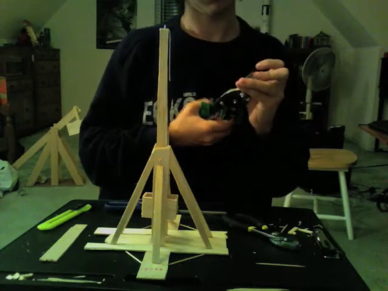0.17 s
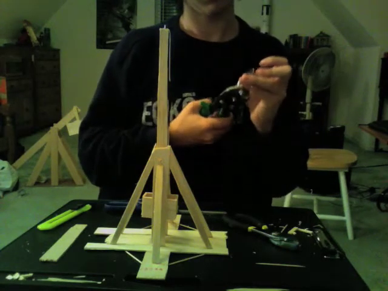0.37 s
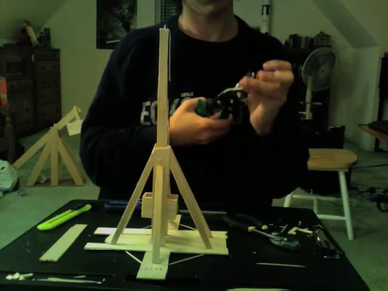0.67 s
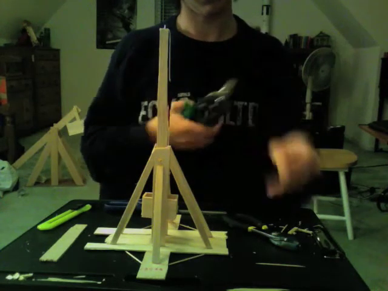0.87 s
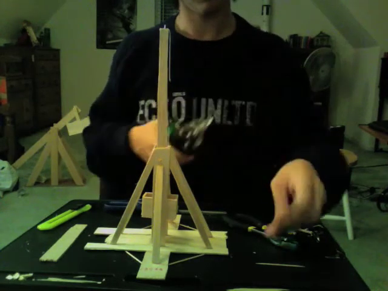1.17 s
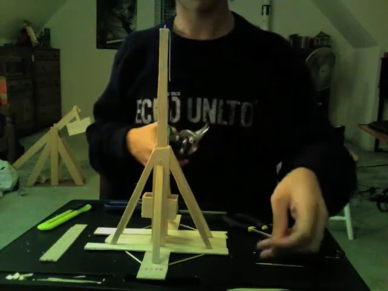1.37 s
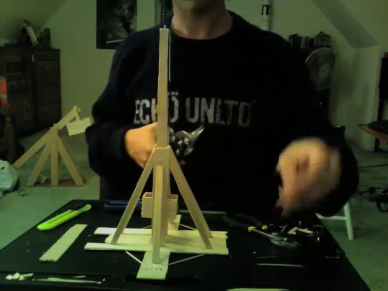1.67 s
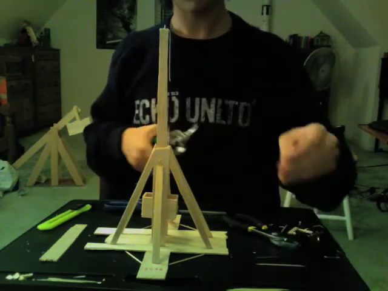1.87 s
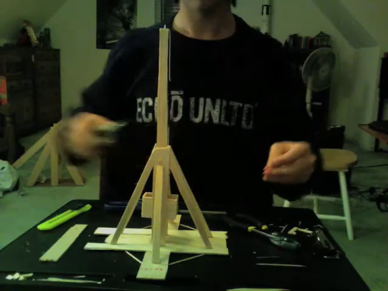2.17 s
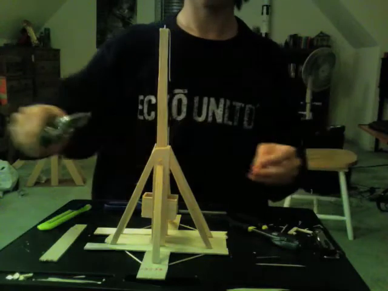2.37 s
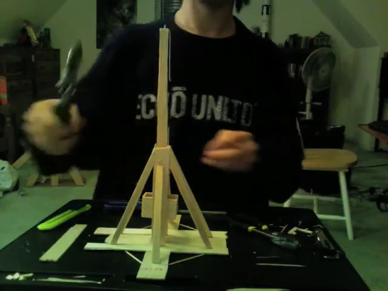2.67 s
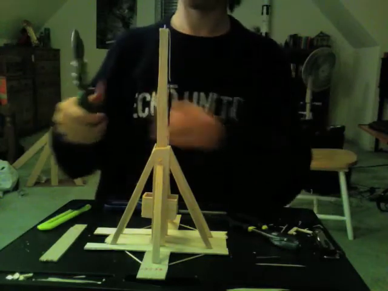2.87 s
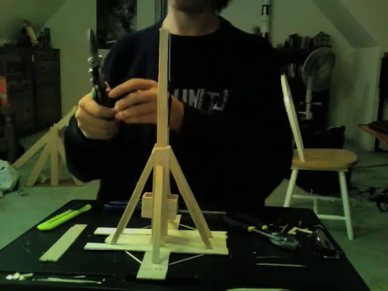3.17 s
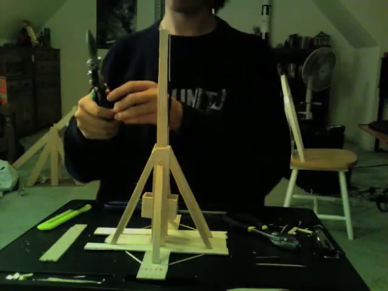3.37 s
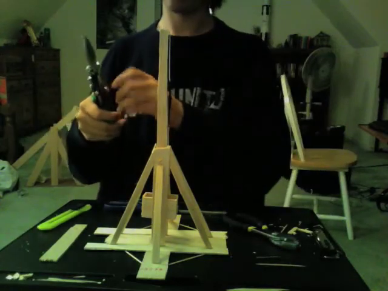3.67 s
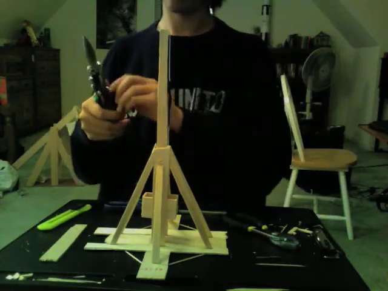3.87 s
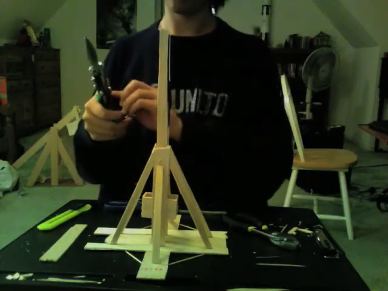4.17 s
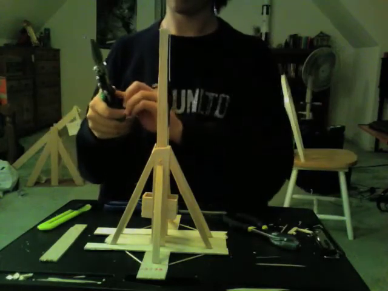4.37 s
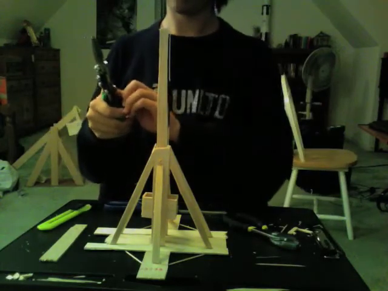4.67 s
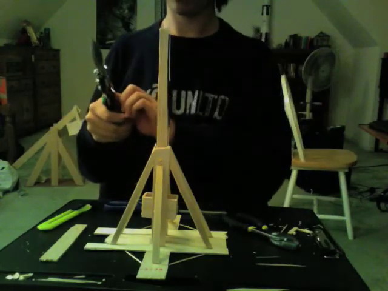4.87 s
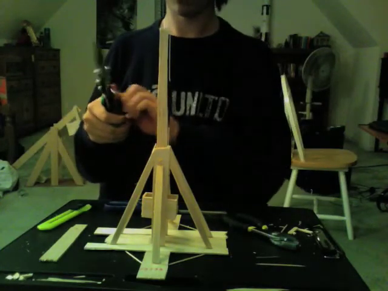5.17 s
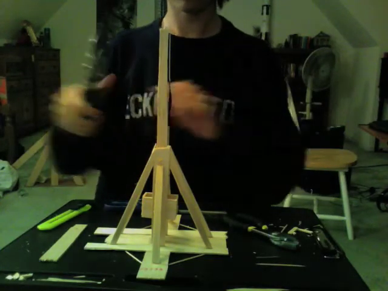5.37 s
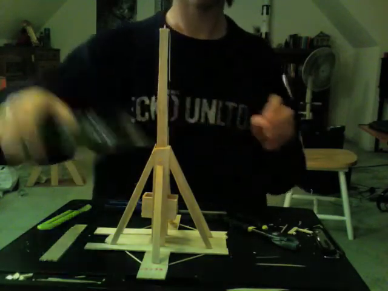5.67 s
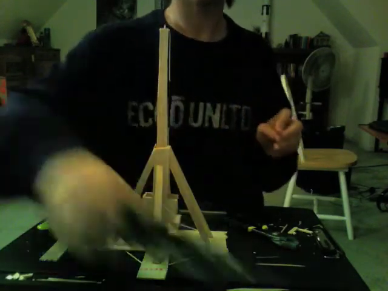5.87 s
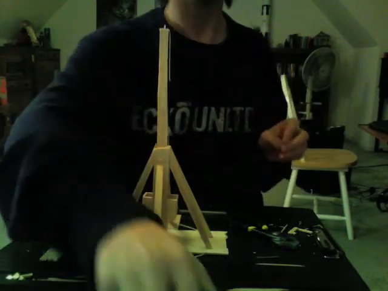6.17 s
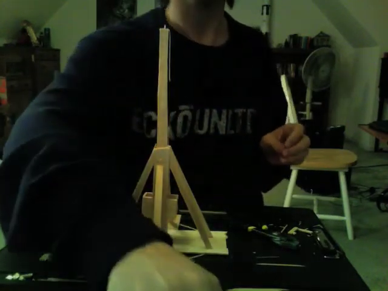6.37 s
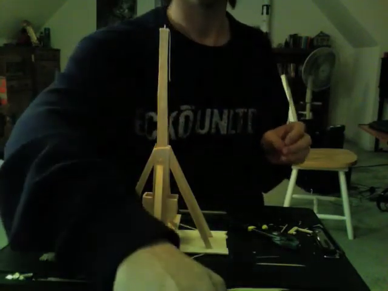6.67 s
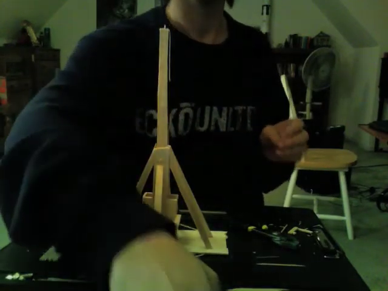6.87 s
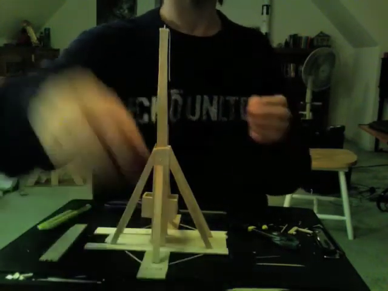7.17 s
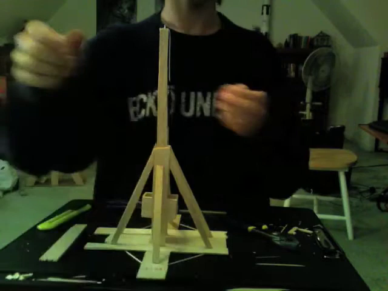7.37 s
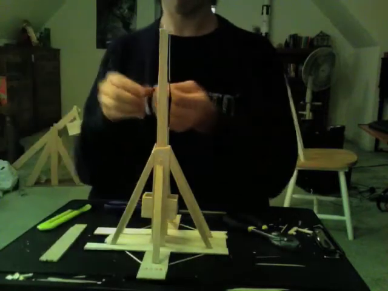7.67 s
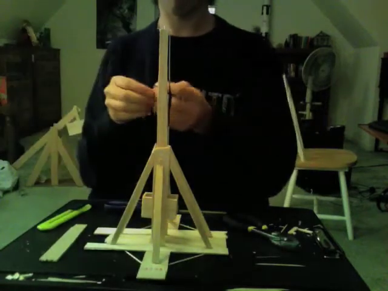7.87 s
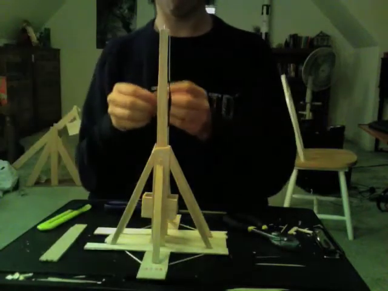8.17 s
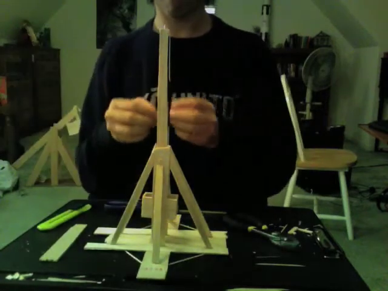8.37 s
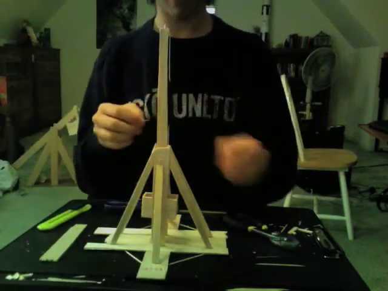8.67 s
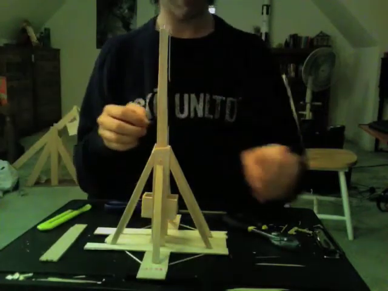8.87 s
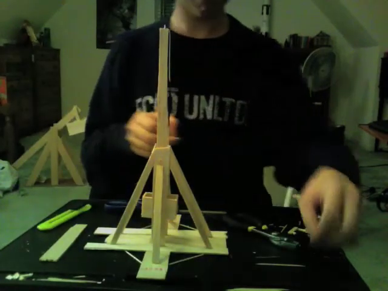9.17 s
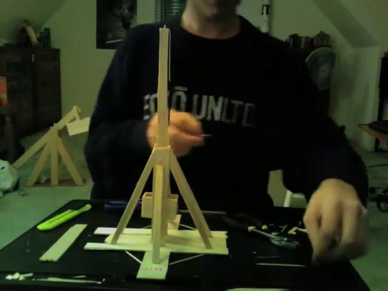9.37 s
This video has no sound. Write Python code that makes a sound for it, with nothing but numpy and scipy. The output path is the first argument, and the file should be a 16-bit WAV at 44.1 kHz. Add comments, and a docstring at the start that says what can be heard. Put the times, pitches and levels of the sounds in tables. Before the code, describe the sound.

Faint clicks and snips of thin wire being cut, then metal snips are set down on a table with two loud knocks.

```python
"""At a work table in a small room, thin wire is picked up and snipped.
Steel jaws click on impact and ring in their modes, and the fingers rub as they keep shifting their grip.
The snips are put down with two heavy knocks that excite the table top, a hand bumps a wooden frame,
and a dropped scrap of wire skitters in ever shorter hops. Reflections and steady room noise surround it all."""
import sys
import numpy as np
from scipy import signal
from scipy.fft import rfft, irfft
from scipy.io import wavfile
from scipy.ndimage import uniform_filter1d

SR = 44100
rng = np.random.default_rng(int(sys.argv[2]) if len(sys.argv) > 2 else 0)


def unload_audio(sound):
    """Save the sound as a 16-bit wav file, at the path given as the first command line argument."""
    columns = np.transpose(np.atleast_2d(sound))
    # keep every value between -1 and 1, then stretch to whole-number steps
    steps = np.round(np.clip(columns, -1, 1) * 32767)
    wavfile.write(sys.argv[1], SR, steps.astype(np.int16))


N = 419391

# the hand's push on the wooden frame: (time [s], level [dB], rise time [s])
FRAME_PUSH = (7.923, -35, 0.0029)


def jaw_clicks(trim_db=-1.0):
    """Elastic impact: wire and jaws tick or snap, and a firmer contact is over sooner."""
    # contacts of wire and steel: (time [s], level [dB], centre [Hz], spread [octaves])
    contacts = [(.0972, -25.5, 2100, 1.44), (.169, -45, 2000, 2.6), (0.445, -47.5, 6500, 0.53),
                (0.7665, -47, 4450, 1), (1.386, -21.5, 11000, 3.9), (1.438, -26.5, 12000, 3.3),
                (1.4936, -47, 3180, 0.92), (1.5486, -50.5, 7000, .7), (2.007, -29.5, 5200, 0.16),
                (2.0071, -32, 3560, 1), (4.07, -41.5, 5200, 0.64), (4.7217, -29, 7740, .76),
                (5.976, -48, 4970, .7)]
    # click decay against firmness: (level [dB], decay time [s])
    contact_decay = [(-42, 0.0032), (-29, 0.00076)]
    out = np.zeros(N)
    for s, db, hz, octaves in contacts:
        decay_s = np.interp(db, *np.transpose(contact_decay))
        add(out, s, click(db + trim_db, hz, octaves, decay_s))
    return out


def metal_rings(detune=.012, twin_gain=0.67, chatter_hz=32):
    """Beating: wire and blades ring in close pairs of modes; contact chatter broadens each line."""
    # modes of the struck metal: (time [s], frequency [Hz], level [dB], t60 [s])
    modes = [(.098, 1132, -32.5, 0.11), (.098, 1245, -40, 0.12), (.098, 2660, -34, 0.051),
             (.0974, 2930, -25, 0.019), (4.722, 5060, -35.5, .011), (4.722, 5650, -45, 0.07),
             (4.723, 10300, -38.5, 0.02), (5.558, 10800, -56, .15), (6.622, 11480, -46, .12),
             (9.239, 12360, -50, 0.14), (9.255, 14500, -53, 0.21)]
    out, t = np.zeros(N), clock(16384)
    for s, hz, db, t60 in modes:
        drift = phase_drift((2, len(t)), chatter_hz)
        mode = np.sin(2 * np.pi * hz * t + drift[0])
        twin = np.sin(2 * np.pi * (hz * (1 + detune) * t + rng.random()) + drift[1])
        add(out, s, amp(db - 60 * t / t60) * (mode + twin_gain * twin))
    return out


def table_knocks(crack_s=0.0044, tail_db=-19, tail_s=0.027, damping_t60_s=.2, rattle_hz=1.5):
    """Modal superposition: the snips crack on the table, and where they land sets each mode's share."""
    # impacts: (time [s], level [dB], place [0 nose, 1 handle], roll-off [Hz], relative crack level [dB])
    impacts = [(6.3452, -0.7, 0.0078, 9000, -16), (6.508, -38.5, 0.65, 700, -30.5),
               (6.6215, 0.5, 0.98, 9000, -12), (6.6577, -8, 0.67, 1700, -25.5),
               (6.7766, -29, 0.36, 550, -32)]
    # table top modes: (frequency [Hz], free t60 [s], level at nose end [dB], level at handle end [dB])
    table_modes = [(87.0, 0.025, -39.5, -19), (117.0, 0.043, -25, -11), (203, 0.049, -34, -3),
                   (217.2, 0.14, -48.5, -16.5), (264.8, 0.044, -7.5, -43.5), (357, 0.082, -11, -11),
                   (406.7, 0.1, -33, -14.5), (526, 0.1, -5.5, -11), (574.7, 0.056, -5, -14),
                   (656.0, 0.29, -30, -20.5), (790.3, 0.056, -3, 4.5), (800.7, 0.024, -4, 9.5),
                   (901, 0.054, -16.5, -7), (1059, 0.054, -14, -6.5), (1202, 0.07, -14.5, -10),
                   (1312, 0.14, -15.5, -11.5), (1362, 0.076, -9.5, -22.5), (1505, 0.064, -16.5, -14.5),
                   (1578, 0.058, -20.5, -13), (1719, 0.35, -30, -23), (1960, 0.05, -17.5, -13),
                   (2177, 0.047, -17, -13), (2490, 0.11, -20.5, -25.5), (2650, 0.037, -30, -19.5),
                   (3157, 0.01, -12, -15), (3270, 0.014, -18.5, -20.5), (4358.0, 0.006, -18.5, -15)]
    # spectrum of steel striking the table: (frequency [Hz], relative density [dB])
    crack_spectrum = [(40, -14), (150, -6.5), (700, -1), (2500, 5), (4500, -6), (6500, -16), (10000, -25.5),
                      (15500, -35)]
    out, t = np.zeros(N), clock(16384)
    hz, t60, nose_db, handle_db = np.transpose(table_modes)
    sign = (-1) ** np.arange(len(hz))  # neighbouring modes swing in opposite directions
    fade = np.exp(-np.log(1000) * t * (1 / t60[:, None] + 1 / damping_t60_s))  # the tool adds damping
    drift = phase_drift(fade.shape, rattle_hz)  # its rattling blurs the lines
    modes = np.sin(2 * np.pi * hz[:, None] * t + drift) * fade
    crack_envelope = np.exp(-t / crack_s) + amp(tail_db) * np.exp(-t / tail_s)
    for s, db, place, rolloff_hz, crack_db in impacts:
        weight = ((1 - place) * amp(nose_db) + place * amp(handle_db)) / np.hypot(1, hz / rolloff_hz)
        steel = crack(lambda f: amp(log_interp(crack_spectrum, f)), crack_envelope)
        add(out, s, amp(db) * ((sign * weight) @ modes + amp(crack_db) * steel))
    bass_cut = signal.butter(3, 66, btype="high", fs=SR, output="sos")  # the knocks carry no deep bass
    return signal.sosfilt(bass_cut, out)


def scrap_hops(count=5, hop_ratio=.645):
    """Inelastic bouncing: after each landing the scrap of wire hops, ever quicker and weaker."""
    # the scrap lands, tips over and settles: (time [s], level [dB], first hop [s], loss per hop [dB])
    landings = [(9.2387, -24.5, .017, 3.5), (9.3058, -35.5, .0045, 3), (9.3187, -39, .007, 8),
                (9.412, -43, .009, 9)]
    out = np.zeros(N)
    for s, db, hop_s, loss_db in landings:
        for k in range(count):
            add(out, s, click(db - k * loss_db, hz=5400, octaves=1.85, decay_s=0.00077))
            s += hop_s * hop_ratio ** k
    return out


def frame_boom():
    """Free vibration: a soft push sets the low modes of the wooden frame booming."""
    # frame modes: (frequency [Hz], relative level [dB], t60 [s])
    modes = [(108, -9, .25), (141, -1.5, 0.37), (186, -5, .22), (274.6, -4, 0.14), (344, -3.5, 0.1),
             (556, -5.5, 0.091)]
    out, t = np.zeros(N), clock(22050)
    s, db, rise_s = FRAME_PUSH
    boom = sum(amp(mode_db - 60 * t / t60) * np.sin(2 * np.pi * hz * t) for hz, mode_db, t60 in modes)
    add(out, s, amp(db) * boom * (1 - np.exp(-t / rise_s)))
    return out


def frame_graze():
    """Sliding friction: the hand rubs along the frame, with a bright rasp at the push."""
    out, s = np.zeros(N), FRAME_PUSH[0]
    add(out, s - .007, stroke(db=-47, hz=700, octaves=1.9, length_s=.028))
    add(out, s - .001, stroke(db=-41.5, hz=6540, octaves=0.51, length_s=0.013))
    return out


def finger_grips(rub_db=-2.5, lead_s=.012, settle_s=0.042, octaves=1.95):
    """Friction and impact: each new grip is a press that clicks the tool, then a settling stroke."""
    # grips: (time [s], level [dB], centre [Hz], relative click level [dB], relative settling level [dB])
    grips = [(.24, -57, 1500, 8, -0.5), (1.0519, -49, 1700, 3, -4), (1.3055, -59.5, 1300, 12, -8),
             (2.2779, -52, 1400, 5, -14), (2.508, -56, 990, 12, -2), (2.622, -53, 780, 5.5, -4),
             (2.872, -52, 700, 10.5, -3.5), (3.6245, -49, 940, 6, -2), (4.456, -50, 1200, 5.5, -18),
             (4.83, -53.5, 1000, 6.5, -0.5), (5.558, -46, 1860, 7.5, -19), (6.296, -55.5, 800, 3, -8)]
    out = np.zeros(N)
    for s, db, hz, click_db, settle_db in grips:
        for delay, stroke_db in (-lead_s, 0), (settle_s, settle_db):
            rub = stroke(db + rub_db + stroke_db, hz, octaves, length_s=.036, grain_db=4.5, rise=0.44)
            add(out, s + delay, rub)
        add(out, s, click(db + click_db, hz, octaves, decay_s=.002))
    return out


def scuffs(scrape_db=-4.5, swell_db=-4):
    """Friction noise: wire scrapes thinly on the jaws, and soft low swells go with the moving arms."""
    # scrapes: (time [s], level [dB], centre [Hz], spread [octaves], length [s])
    scrapes = [(.47, -57, 10550, 1.1, 0.025), (0.754, -54, 4850, .9, 0.02),
               (1.981, -49.5, 3140, 0.93, 0.027), (5.237, -54, 2850, 0.16, 0.033),
               (5.858, -57, 9300, 0.34, .034), (8.766, -58, 2400, 0.53, 0.058)]
    # arm movements: (time [s], level [dB])
    swells = [(2.039, -56.5), (4.001, -65), (7.28, -62)]
    out = np.zeros(N)
    for s, db, hz, octaves, length_s in scrapes:
        add(out, s, stroke(db + scrape_db, hz, octaves, length_s))
    for s, db in swells:
        add(out, s, stroke(db + swell_db, hz=288, octaves=0.12, length_s=.13))
    return out


def wire_slide():
    """Sliding friction: wire drawn between the fingers gives a fine hiss."""
    # envelope of the hiss: (time [s], level [dB])
    levels = [(8.72, -78), (8.83, -66), (8.92, -59), (9.03, -62.5), (9.12, -77)]
    s, db = np.transpose(levels)
    envelope = amp(np.interp(clock(N), s, db, left=-np.inf, right=-np.inf))
    return envelope * coloured(resonance(centre_hz=12000, octaves=1.0), N)


def echoes(x):
    """Early reflection: table top, ceiling and walls return delayed, weaker copies."""
    # reflections: (delay [s], gain [ratio])
    reflections = [(.00039, .33), (.0079, .36), (.0088, 0.18), (0.0163, .16), (0.0267, 0.0996)]
    out = np.zeros(N)
    for delay, gain in reflections:
        add(out, delay, gain * x)
    return out


def reverb(x, gap_s=.008):
    """Reverberation: a diffuse tail of unit energy, each band decaying at its own rate."""
    # room decay: (frequency [Hz], t60 [s])
    decay_times = [(100, 0.24), (300, .3), (1000, .28), (3000, 0.24), (8000, 0.2), (15000, 0.4)]
    hz, t, spectra = signal.stft(rng.choice([-1., 1.], size=22050), SR, nperseg=256)
    fade = np.exp(-np.log(1000) * t / log_interp(decay_times, hz)[:, None])
    tail = signal.istft(spectra * fade, SR, nperseg=256)[1]
    out = np.zeros(N)
    add(out, gap_s, signal.fftconvolve(x, tail / np.linalg.norm(tail)))
    return out


def room_noise(level_db=-58.5):
    """Stationary noise: a steady low hush with a few broad resonances."""
    # noise spectrum: (frequency [Hz], relative density [dB])
    spectrum = [(15, -51.5), (25, -28.5), (70, -4.5), (165, -1.5), (316, -6.5), (392, -6), (449, -9.5),
                (620, -6), (1680, -14), (1820, -14.5), (2330, -17), (3220, -17), (3680, -20),
                (11700, -28.5), (15800, -29)]
    # resonances: (centre [Hz], width [Hz], boost [dB])
    peaks = [(700, 90, 2.5), (1798, 130, 6), (2860, 350, 1.5), (10400, 3300, 3.5)]

    def gain(hz):
        boost_db = sum(db * np.exp(-((hz - centre) / width) ** 2) for centre, width, db in peaks)
        return amp(log_interp(spectrum, hz) + boost_db)
    return amp(level_db) * coloured(gain, N)


def click(db, hz, octaves, decay_s, shiver_db=-20, shiver_s=.005):
    """Impact transient: a very short crack and a faint shiver of the parts."""
    t = clock(2048)
    envelope = np.exp(-t / decay_s) + amp(shiver_db) * np.exp(-t / shiver_s)
    return amp(db) * crack(resonance(hz, octaves), envelope)


def stroke(db, hz, octaves, length_s, grain_db=4, rise=0.26):
    """Stick-slip friction: each stroke is a swell of uneven grains."""
    t = clock(12288)
    swell = np.minimum(t / (rise * length_s), 1) / (1 + (t / length_s) ** 8)
    slips = unit_rms(uniform_filter1d(rng.standard_normal(len(t)), size=70))
    grains = unit_rms(amp(grain_db * min(octaves, 1) * slips))  # a narrow resonance smooths the slips
    envelope = swell * grains
    rub = coloured(resonance(hz, octaves), len(t)) * envelope
    return amp(db) * with_energy_of(envelope, rub)


def crack(colour, envelope, band_hz=500):
    """Spectral shaping: a noise burst is whitened so that it follows colour(hz) without chance holes."""
    size = 2 * len(envelope)
    spectrum = rfft(rng.standard_normal(len(envelope)) * envelope, size)
    power = uniform_filter1d(abs(spectrum) ** 2, size=round(band_hz * size / SR))
    shaped = spectrum / np.sqrt(power) * colour(np.fft.rfftfreq(size, 1 / SR))
    return with_energy_of(envelope, irfft(shaped)[:len(envelope)])


def resonance(centre_hz, octaves, low_hz=330):
    """Gain curve of one broad resonance of a small object, which radiates little bass."""
    def gain(hz):
        peak = np.exp(-.5 * (np.log2((hz + 1) / centre_hz) / octaves) ** 2)
        return peak * hz ** 2 / (hz ** 2 + low_hz ** 2)
    return gain


def phase_drift(shape, width_hz):
    """Line broadening: a random walk in phase spreads a mode over width_hz."""
    return np.cumsum(rng.standard_normal(shape), axis=1) * np.sqrt(2 * np.pi * width_hz / SR)


def coloured(gain, size):
    """Random-phase noise of rms 1 whose spectrum follows gain(hz)."""
    hz = np.fft.rfftfreq(size, 1 / SR)
    return unit_rms(irfft(gain(hz) * np.exp(2j * np.pi * rng.random(len(hz))), size))


def with_energy_of(envelope, x):
    """Scales x to the energy of the envelope."""
    return x * np.linalg.norm(envelope) / np.linalg.norm(x)


def unit_rms(x):
    """Scales to an rms of 1."""
    return x / np.sqrt(np.mean(x ** 2) + 1e-20)


def amp(db):
    """Decibels to gain."""
    return 10 ** (np.asarray(db) / 20)


def log_interp(points, hz):
    """Interpolates a table along a log-frequency axis."""
    f, value = np.transpose(points)
    return np.interp(np.log(hz + 1), np.log(f + 1), value)


def add(mix, s, sound):
    """Superposes a sound on the mix at time s."""
    part = mix[max(round(s * SR), 0):][:len(sound)]
    part += sound[:len(part)]


def clock(size):
    """Sample times in seconds."""
    return np.arange(size) / SR


def scene(hand_wet_db=-3, ring_wet_db=-2, ring_dry_db=-4, scrap_wet_db=-5.5, table_wet_db=-13):
    """Direct and diffuse sound: the hands, farther off than the table's edge, carry more of the room."""
    hands = jaw_clicks() + finger_grips() + scuffs() + frame_graze()
    metal = metal_rings()
    wood = table_knocks() + frame_boom()
    scrap = scrap_hops()
    room = reverb(amp(hand_wet_db) * hands + amp(ring_wet_db) * metal + amp(scrap_wet_db) * scrap)
    room += reverb(amp(table_wet_db) * wood, gap_s=.012)
    direct = hands + scrap + amp(ring_dry_db) * metal + wood + wire_slide()
    mono = direct + echoes(hands + scrap) + room + room_noise()
    return np.array([mono, mono])


def record(dry, ceiling=.97, edge_hz=15950):
    """Soft saturation rounds off the loudest knocks; a low-pass filter then limits the band."""
    limited = dry / (1 + (dry / ceiling) ** 8) ** (1 / 8)
    lowpass = signal.firwin(255, edge_hz, window=("kaiser", 9), fs=SR)
    return signal.oaconvolve(limited, lowpass[None], "same")


dry = scene()
out = record(dry)
unload_audio(out)
```